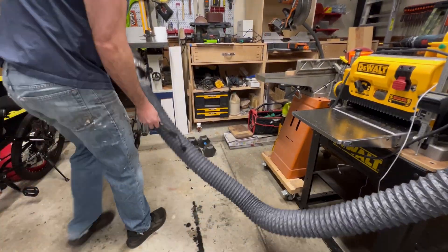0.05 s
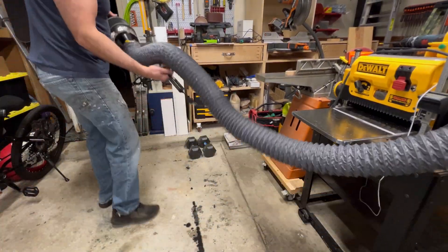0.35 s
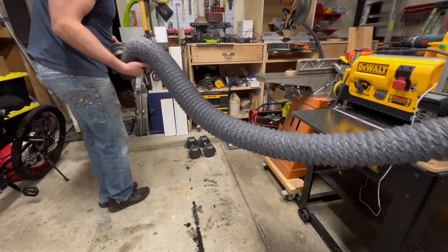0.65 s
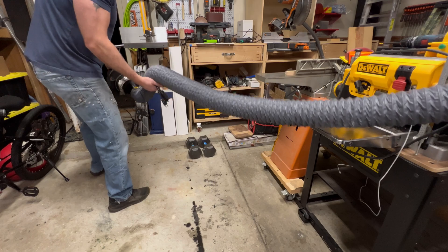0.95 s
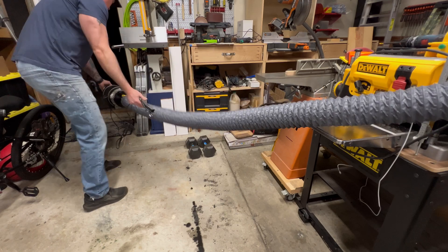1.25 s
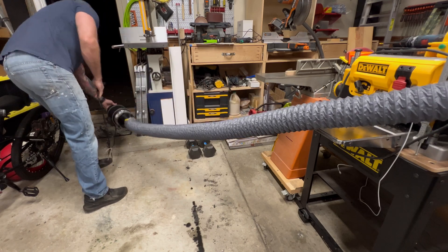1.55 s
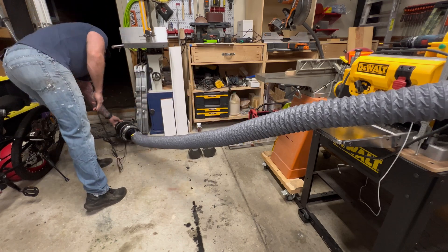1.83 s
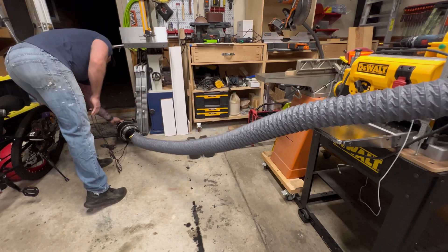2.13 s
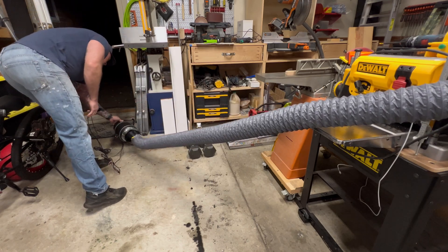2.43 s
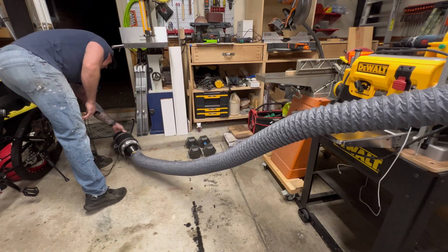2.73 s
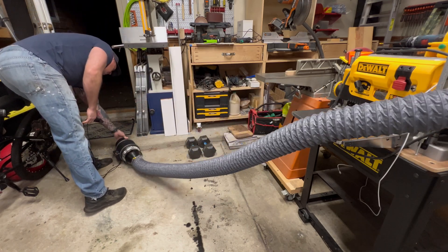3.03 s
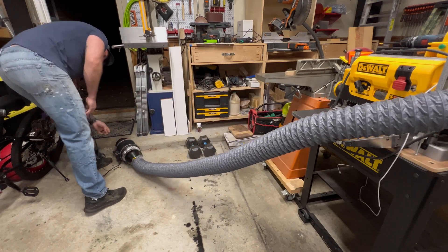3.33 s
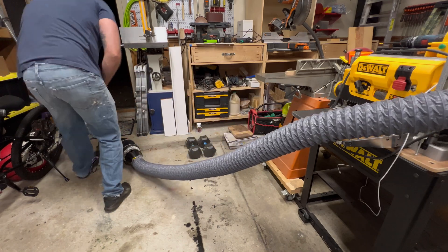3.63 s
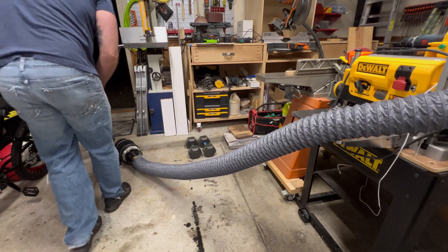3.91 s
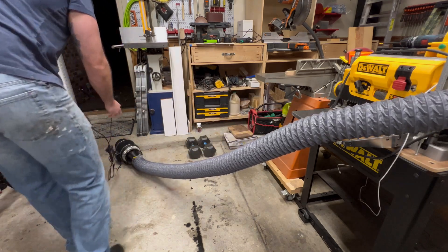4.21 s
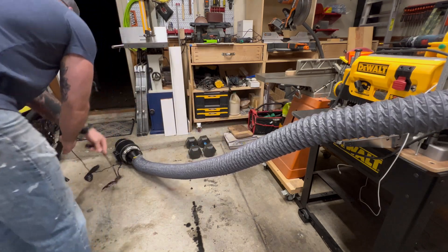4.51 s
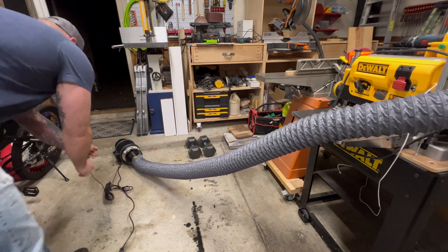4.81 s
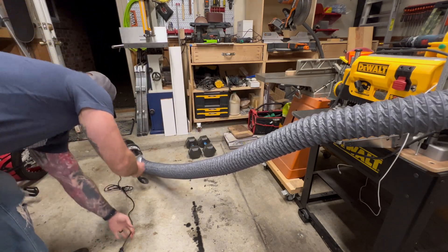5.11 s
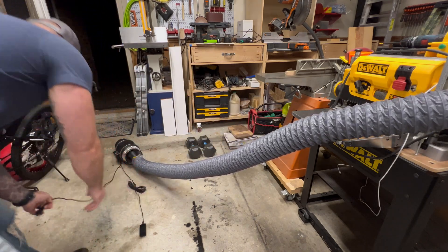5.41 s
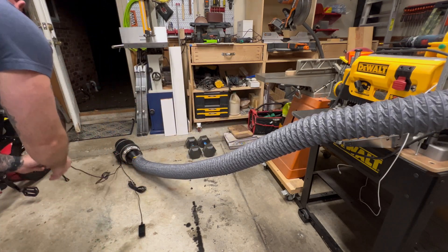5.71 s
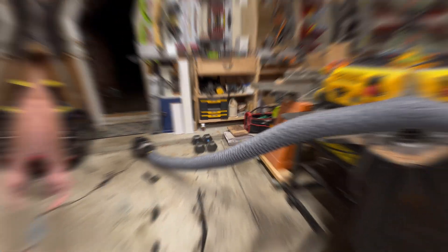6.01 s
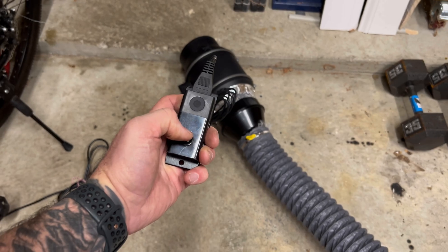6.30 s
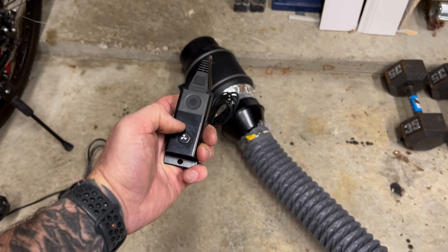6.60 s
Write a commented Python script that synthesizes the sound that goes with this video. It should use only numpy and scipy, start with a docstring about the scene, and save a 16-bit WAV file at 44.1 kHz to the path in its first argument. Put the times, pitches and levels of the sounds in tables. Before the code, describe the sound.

A plastic fan and ribbed hose knock and rustle, clunk onto concrete, an adapter clatters down, then the fan whirs steadily.

```python
"""Rustling and light rattles come first, near a stereo pair of microphones in a quiet garage workshop:
someone carries an inline fan on a ribbed flexible duct. The housing knocks, the duct rubs and bumps,
shoes scuff, a steel clamp jingles, a faint hum comes and goes. The fan is set down hard on the concrete,
and later its power adapter clatters to the floor. All fades out on a last click, and the running fan
fades in close by, a whirr of turbulent air and shaft tones."""
import sys
import numpy as np
from scipy import signal
from scipy.fft import rfft, irfft, next_fast_len
from scipy.io import wavfile
from scipy.ndimage import map_coordinates

SR = 44100
rng = np.random.default_rng(int(sys.argv[2]) if len(sys.argv) > 2 else 0)


def persist_wave(psi):
    """Save psi, clipped to +-1, as 16-bit WAV."""
    counts = np.round(np.clip(psi, -1, 1) * 32767).astype(np.int16)
    wavfile.write(sys.argv[1], SR, np.atleast_2d(counts).T)


N = 297675
TIME = np.arange(N) / SR
AFTER = np.arange(SR * 3 // 5) / SR  # seconds since a contact

# body movements that rustle clothes and duct (start [s], end [s], level [dB])
MOVES = [(0, 0.02, -64), (0.263, 0.743, -62), (1.154, 1.408, -63.5), (1.5, 1.71, -67.5), (2.044, 2.3, -76),
         (3.444, 3.857, -73), (4.55, 5.25, -69.5), (5.522, 5.533, -61), (5.949, 6.002, -60)]
# colour of the rustle (frequency [Hz], gain [dB])
RUSTLE_COLOUR = [(150, -8.5), (400, 11), (1200, 1), (3000, 6.5), (6000, 0.5), (12000, 2), (16000, -8.5)]
# colour of the garage's room tone (frequency [Hz], gain [dB])
ROOM_TONE_COLOUR = [(25, -35), (55, -31.5), (80, -16.5), (110, -4), (170, -0.5), (215, -10.5), (300, -8),
                    (380, -18.5), (1300, -28), (2500, -27.5), (3900, -20.5), (5200, -33.5), (14000, -42.5)]
# knocks of housing and cord (time [s], level [dB], weight [dB], hardness [dB], spot resonance [Hz])
KNOCKS = [(0.042, -58.5, -5, -8.5, 970), (0.177, -52.5, 2, -4.5, 870), (0.251, -46.5, 5, -4, 790),
          (0.3319, -41, 1.5, -0.5, 785), (0.527, -67.5, 12, 20.5, 6200), (0.668, -57, 1, 10.5, 1120),
          (0.965, -57.5, -10, -2, 760), (0.979, -46, 4, -2.5, 800), (1.414, -50.5, 7, -2, 1090),
          (1.779, -67, 3, 9, 2240), (1.945, -46.5, -6, 0, 2220), (2.045, -44.5, -19, -12, 1350),
          (2.123, -42.5, -6, -13, 2250), (2.363, -57.5, 3.5, -21, 690), (2.635, -45, -0.5, 3, 3740),
          (4.75, -46.5, -5, 11.5, 820), (5.6733, -58, 2, -24, 513), (5.866, -70.5, 8, 18, 550),
          (6.022, -40.5, -8, 11.5, 2600)]
# modes of the plastic fan housing (frequency [Hz], level [dB], t60 before extra damping [s])
HOUSING_MODES = [(110, -3, .3), (165, -6, .25), (298, -4, .3), (533, 1, .33), (671, -7, .24),
                 (1277, -2, .3), (2196, -7, .14), (2627, -3, .16), (2900, -3, .16), (3278, -3, .2),
                 (3420, -3, .14), (3634, -7, .14), (6729, -8, .12), (8705, -10, .12)]
# rubs of duct, clothes and soles (time [s], length [s], level [dB], tilt [dB/step], spot resonance [Hz])
SCRAPES = [(0.268, 0.071, -63, 3, 760), (0.581, .028, -41, -3.5, 1130), (1.184, .077, -56, 4.5, 2300),
           (1.215, 0.054, -44.5, 1.63, 714), (2.045, 0.026, -45, -3, 1420), (2.195, 0.091, -53, -3, 450),
           (3.525, 0.025, -68.5, 2, 2420), (3.809, 0.076, -67.5, -5, 1460), (3.885, 0.043, -59, 2, 2250),
           (4.026, 0.066, -65, 0.1, 2100), (4.25, 0.049, -65, 1, 2160), (4.403, .04, -70.5, 1, 2070),
           (4.48, 0.058, -56.5, 4, 4060), (4.631, 0.083, -63, 2, 800), (4.785, .06, -61.5, 2.5, 790),
           (5.006, .06, -62.5, -0.5, 2000), (5.197, 0.044, -77.5, 6, 3900), (5.639, 0.034, -64.5, -1, 1500)]
# hollow bumps of the swinging duct (time [s], pitch [Hz], level [dB])
BUMPS = [(0.496, 295, -54), (0.71, 245, -48.5), (4.664, 352, -56.5), (4.708, 384, -55), (5.518, 506, -61)]
# jolts that ring the steel clamp on the duct (time [s], level [dB])
JINGLES = [(1.944, -56), (2.363, -69), (2.635, -54)]
# modes of the clamp (frequency [Hz], level [dB], t60 before extra damping [s])
CLAMP_MODES = [(3677, 0, .12), (5378, -9, .08), (6100, -10, .12), (10000, -7, .25)]
# the fan lands on its rim, then rocks flat (time [s], relative level [dB])
LANDING_CONTACTS = [(2.8598, -0.5), (2.8612, -1), (2.8665, -10), (2.8705, -2)]
# colour of that clunk before its band levels are set (frequency [Hz], gain [dB])
CLUNK_COLOUR = [(24, -63), (40, -38), (101, -9), (290, -3), (382, -9), (433, -18.5), (529, -2.5),
                (852, -10), (1270, -7), (1520, -10), (2840, -2.5), (5580, -10.5), (9690, -8),
                (13800, -20.5), (16000, -39)]
# the adapter lands corner by corner and bounces (time [s], relative level [dB])
DROP_CONTACTS = [(5.3645, -36), (5.3804, -10), (5.3836, -2.5), (5.388, -9.5), (5.394, -19), (5.399, -16),
                 (5.4402, -29)]
# modes of the adapter case (frequency [Hz], level [dB], t60 before extra damping [s])
ADAPTER_MODES = [(2606, -7, .05), (4830, -3, .04), (5211, -2, .05), (5650, -4, .04), (5990, -1, .06),
                 (8457, -8, .04), (10700, -3, .03), (12350, -2, .04)]
# colour of that clack before its band levels are set (frequency [Hz], gain [dB])
CLACK_COLOUR = [(120, -77), (200, -42), (294, -23), (519, -25.5), (735, -25), (899, -29.5), (1020, -23),
                (1300, -24), (2610, -9.5), (4200, -8.5), (5520, -1.5), (8120, -10.5), (12200, -6.5),
                (16000, -10.5)]
# colour of the air rushing through the fan (frequency [Hz], gain [dB])
RUSH_COLOUR = [(18, -57), (30, -31), (65, -10), (130, -13), (172, -0.5), (241, -5), (354, -0.5), (495, -14),
               (624, -17), (674, -17), (1100, -14), (4750, -30.5), (7550, -39), (10300, -56.5),
               (14000, -67.5)]
# tones of the running fan (multiple of shaft speed [ratio], relative level [dB])
FAN_TONES = [(2, -13), (3, -10), (4, -0.5), (5, -4.5), (7, -10.5), (12, -17)]
# thud, body, clack and tick bands of a contact (low edge [Hz], high edge [Hz])
CONTACT_BANDS = [(80, 300), (300, 1800), (1800, 5000), (8000, 16000)]
# colour the garage gives to knocks, rubs and landings (frequency [Hz], gain [dB])
GARAGE_COLOUR = [(25, -38.5), (55, -30.5), (85, -11), (110, 6.5), (180, 3), (300, 0.5), (12500, 1),
                 (16000, -9)]
# reverberation of the garage (frequency [Hz], t60 [s])
GARAGE_DECAY = [(100, 0.44), (500, 0.31), (1500, 0.27), (4000, 0.23), (8000, 0.23), (15000, 0.23)]
# likeness of the sound at the two microphones (frequency [Hz], coherence [0 to 1])
MIC_COHERENCE = [(100, .97), (300, .8), (600, .5), (1100, 0), (3000, 0)]
# the left microphone hears more, above all in the treble (frequency [Hz], left minus right [dB])
MIC_BALANCE = [(100, 4), (450, 5.5), (1200, 3), (3000, 4.5), (6000, 6), (9000, 10), (12000, 13)]

# band levels (thud [dB], body [dB], clack [dB], tick [dB]); knocks and rubs add their own level
KNOCK_DB, RUB_DB = (-6.5, 1, -0.2, -10), (-8, -1, 1.5, -3.5)
LANDING_DB, DROP_DB = (-38, -32, -28.5, -32), (-69, -47, -31.5, -25.5)
TOP_HZ = 16000


def amp(db):
    """Decibels to gain."""
    return 10 ** (np.asarray(db) / 20)


def rms(x):
    """Root mean square."""
    return np.sqrt(np.mean(x ** 2) + 1e-20)


def along(points, hz):
    """Interpolate (frequency [Hz], value) points on a log axis."""
    knots_hz, values = np.transpose(points)
    return np.interp(np.log(hz + 1), np.log(knots_hz + 1), values)


def wobble(rate):
    """A smooth random curve, rate knots a second."""
    return map_coordinates(rng.standard_normal(int(N * rate / SR) + 4), [TIME * rate])


def ramp(seconds, length_s):
    """A gain that climbs evenly from 0 to 1 while seconds runs from 0 to length_s."""
    return np.clip(seconds / length_s, 0, 1)


def held(start, end, rise_s, fall_s):
    """A gain that has risen by start, holds, and falls away after end."""
    return ramp(TIME - start + rise_s, rise_s) * ramp(end + fall_s - TIME, fall_s)


def add(track, s, sound):
    """Mix a sound into the track at time s."""
    start = max(round(s * SR), 0)
    track[:, start:start + sound.shape[-1]] += sound[:, :N - start]


def filtered(x, gain):
    """x through the minimum-phase filter that has this gain at each frequency."""
    n = x.shape[-1]
    size = 2 * next_fast_len(n // 2 + 4096)
    hz = np.fft.rfftfreq(size, 1 / SR)
    cepstrum = irfft(np.log(np.maximum(gain(hz), 1e-6)))
    cepstrum[..., 1:size // 2] *= 2
    cepstrum[..., size // 2 + 1:] = 0
    return irfft(rfft(x, size) * np.exp(rfft(cepstrum)), size)[..., :n]


def coloured(x, points):
    """x with the colour of (frequency [Hz], gain [dB]) points."""
    return filtered(x, lambda hz: amp(along(points, hz)))


def diffuse(n):
    """White noise from all sides: alike at both microphones in the bass, unrelated in the treble."""
    size = next_fast_len(n)
    coherence = along(MIC_COHERENCE, np.fft.rfftfreq(size, 1 / SR))
    angle = np.arccos(np.clip(coherence, -1, 1)) / 2
    spectra = rfft(rng.standard_normal((2, size)))
    mid, side = irfft(spectra * [np.cos(angle), np.sin(angle)], size)[:, :n]
    return np.array([mid + side, mid - side])


def noise_bed(colour):
    """Coloured diffuse noise of rms 1."""
    noise = coloured(diffuse(N), colour)
    return noise / rms(noise)


def garage(x, direct_db, crack_s=0.00063):
    """A short direct crack reaches the microphones, then the cluttered room's tail, longest in the bass."""
    hz, t, spectra = signal.stft(diffuse(len(AFTER)), SR, nperseg=256)
    decay = amp(-60 * t / along(GARAGE_DECAY, hz)[:, None])
    tail = signal.istft(spectra * decay, SR, nperseg=256)[1][:, :len(AFTER)]
    tail *= 1 - np.exp(-AFTER / 0.002)  # reflections take a moment to build up
    direct = diffuse(len(AFTER)) * np.exp(-AFTER / crack_s * 2)
    response = tail / rms(tail) + amp(direct_db) * direct / rms(direct)
    return signal.fftconvolve(x[None], response, axes=1)[:, :len(AFTER)]


def rustle(rise_s=0.07, fall_s=0.13, standing_db=-82):
    """Denim and duct skin crinkle softly while they move, and barely at all between moves."""
    moving = np.max([amp(db) * held(start, end, rise_s, fall_s) for start, end, db in MOVES], axis=0)
    crinkle = amp(wobble(27) + 1.8 * wobble(200))
    return (moving + amp(standing_db)) * crinkle * noise_bed(RUSTLE_COLOUR)


def room_tone(level_db=-65):
    """The garage itself: low rumble and faint hiss all round the microphones."""
    return amp(level_db + wobble(23)) * noise_bed(ROOM_TONE_COLOUR)


def rattle(rebound_db, span_s, count=5):
    """A first contact, then loose parts chatter for a moment."""
    contacts = (AFTER == 0) * 1.
    rebounds = (rng.uniform(.1, 1, count) * span_s * SR).astype(int)
    contacts[rebounds] += amp(rebound_db + rng.normal(0, 2, count))
    return contacts


def struck(modes, ring_db, damping):
    """One contact: an impulse, and the object's modes at fresh strengths."""
    hz, db, t60 = np.transpose(modes)[:, :, None]
    envelopes = amp(db + rng.normal(0, 3.5, db.shape) - 60 * damping * AFTER / t60)
    ring = np.sum(envelopes * np.sin(2 * np.pi * hz * AFTER), axis=0)
    return (AFTER == 0) + amp(ring_db) * ring / np.linalg.norm(ring)


def uneven(x, depth_db, count=45):
    """Each spot of contact favours other resonances."""
    gains_db = depth_db * rng.standard_normal(count)
    return coloured(x, np.transpose([np.geomspace(200, TOP_HZ, count), gains_db]))


def spot(x, centre_hz, lift_db=7, half_width_octaves=0.19):
    """The touched spot lifts one hollow resonance above the rest."""
    def gain(hz):
        detuning = np.log2((hz + 1) / centre_hz) / half_width_octaves
        return amp(lift_db / (1 + detuning ** 2))
    return filtered(x, gain)


def weighted(x, levels_db, window_s):
    """Give a contact its weight and hardness: band levels over its first moments."""
    x = coloured(x, GARAGE_COLOUR)
    centres_hz = np.sqrt(np.prod(CONTACT_BANDS, axis=1))
    size = round(window_s * SR)
    hz = np.fft.rfftfreq(size, 1 / SR)
    for _ in range(2):  # neighbouring bands overlap, so the colour settles in two passes
        power = 2 * np.mean(abs(rfft(x[:, :size]) / size) ** 2, axis=0)
        now_db = [10 * np.log10(power[(hz >= lo) & (hz < hi)].sum() + 1e-20) for lo, hi in CONTACT_BANDS]
        x = coloured(x, np.transpose([centres_hz, np.subtract(levels_db, now_db)]))
    return x


def housing_knocks():
    """Light blows rattle the plastic housing and ring the room; weight adds thud, hardness adds tick."""
    out = np.zeros((2, N))
    for s, db, weight_db, hardness_db, spot_hz in KNOCKS:
        levels_db = db + np.add(KNOCK_DB, [weight_db, 0, 0, hardness_db])
        chatter = rattle(rebound_db=-9.5, span_s=.024)
        ring = struck(HOUSING_MODES, ring_db=-25, damping=0.99)
        blow = signal.fftconvolve(chatter, ring)[:len(AFTER)]
        blow = spot(uneven(blow, depth_db=3.5), spot_hz)
        at_mics = garage(blow, direct_db=-0.5, crack_s=0.0058)
        add(out, s, weighted(at_mics, levels_db, window_s=.05))
    return out


def scrapes(slips_per_s=3500, spread_db=4):
    """Duct, clothes and soles rub: each stroke is a swelling run of tiny slips of uneven size."""
    out = np.zeros((2, N))
    tilt_steps = np.array([0, -1, 1, 3])  # tilt brightens or dulls the bands above the thud
    for s, length_s, db, tilt_db, spot_hz in SCRAPES:
        levels_db = db + np.add(RUB_DB, tilt_db * tilt_steps)
        stroke = np.sin(np.pi * ramp(AFTER, length_s)).clip(0)
        slips = (rng.random(len(AFTER)) < slips_per_s / SR) * rng.choice([-1, 1], len(AFTER))
        sizes = amp(spread_db * rng.standard_normal(len(AFTER)))
        at_mics = garage(spot(stroke * slips * sizes, spot_hz), direct_db=1)
        add(out, s, weighted(at_mics, levels_db, window_s=length_s + .02))
    return out


def duct_bumps(decay_s=0.0041):
    """Close to the microphones, the slack duct answers a jolt with a brief hollow note."""
    out = np.zeros((2, N))
    for s, hz, db in BUMPS:
        note = np.sin(2 * np.pi * hz * AFTER) * AFTER * np.exp(-AFTER / decay_s)
        at_mics = garage(note, direct_db=14.5)
        add(out, s, amp(db) * at_mics / rms(at_mics[:, :SR // 25]))
    return out


def hum(start_s=1.5, end_s=4.8, swell_s=0.17, hz=254, rise_hz_per_s=6, level_db=-66, sag_db_per_s=1.5):
    """A faint wavering hum swells in, creeps up in pitch while its level sags, and dies away."""
    age = TIME - start_s
    phase = 2 * np.pi * np.cumsum(hz + rise_hz_per_s * age) / SR
    tone = np.sqrt(2) * np.sin(phase + 0.34 * wobble(6.1))
    level = amp(level_db - sag_db_per_s * age + wobble(8.4))
    return tone * level * held(start_s, end_s, swell_s, swell_s)


def clamp_jingles():
    """The steel band rings thinly, close by, while the fan is lowered."""
    out = np.zeros((2, N))
    for s, db in JINGLES:
        at_mics = garage(struck(CLAMP_MODES, ring_db=10.5, damping=1.7), direct_db=9.5)
        add(out, s, amp(db) * at_mics / rms(at_mics[:, :SR // 25]))
    return out


def impact(contacts, modes, colour, levels_db, ring_db, direct_db, damping, crack_s):
    """A hard landing on concrete: several contacts in quick succession."""
    first_s = contacts[0][0]
    hit, out = np.zeros((2, N)), np.zeros((2, N))
    for s, db in contacts:
        add(hit, s - first_s, amp(db) * garage(struck(modes, ring_db, damping), direct_db, crack_s))
    hit = coloured(hit[:, :len(AFTER)], colour)
    add(out, first_s, weighted(hit, levels_db, window_s=.1))
    return out


def fan_landing():
    """The housing clunks down on its rim and rocks flat."""
    return impact(LANDING_CONTACTS, HOUSING_MODES, CLUNK_COLOUR, LANDING_DB,
                  ring_db=-16.5, direct_db=-2.5, damping=2.3, crack_s=0.0042)


def adapter_drop():
    """The small case clatters brightly on the floor, with more room than direct sound."""
    return impact(DROP_CONTACTS, ADAPTER_MODES, CLACK_COLOUR, DROP_DB,
                  ring_db=-12, direct_db=-5, damping=1.6, crack_s=0.0016)


def running_fan(shaft_hz=90.8, level_db=-43, rush_db=-1, tone_db=-11, jitter_rad=0.33):
    """Close up: turbulent air in the housing, with unsteady tones at multiples of the shaft speed."""
    shaft = 2 * np.pi * shaft_hz * TIME
    tones = sum(amp(db + 2.3 * wobble(16)) * np.sin(multiple * shaft + jitter_rad * wobble(14))
                for multiple, db in FAN_TONES)
    air = amp(rush_db + 0.74 * wobble(30)) * noise_bed(RUSH_COLOUR)
    return amp(level_db) * (air + amp(tone_db) * np.sqrt(2) * tones)


def scene(silence_s=6.092, fade_out_s=0.49, fade_in_s=0.53):
    """Handling and two landings in the garage fade to an instant of silence; the running fan fades in."""
    landings = fan_landing() + adapter_drop()
    handling = housing_knocks() + clamp_jingles() + scrapes() + duct_bumps() + rustle()
    ambience = hum() + room_tone()
    fade_out = ramp(silence_s - TIME, fade_out_s)
    fade_in = ramp(TIME - silence_s, fade_in_s)
    return fade_out * (landings + handling + ambience) + fade_in * running_fan()


def record(dry):
    """Two unlike microphones, the left louder and brighter, and a steep band limit."""
    size = next_fast_len(N + SR // 2)
    hz = np.fft.rfftfreq(size, 1 / SR)
    mic_gains = amp(np.outer([.5, -.5], along(MIC_BALANCE, hz)))
    mic_gains /= np.sqrt(np.mean(mic_gains ** 2, axis=0))
    band_limit = 1 / (1 + (hz / TOP_HZ) ** 200)
    return irfft(rfft(dry, size) * mic_gains * band_limit, size)[:, :N]


dry = scene()
out = record(dry)
persist_wave(out)
```